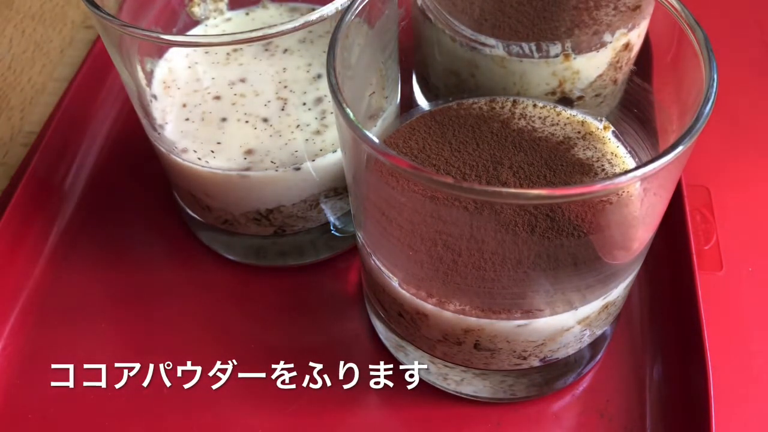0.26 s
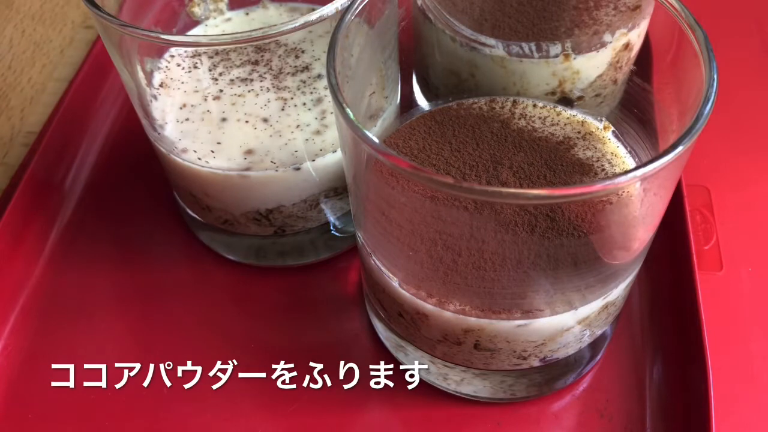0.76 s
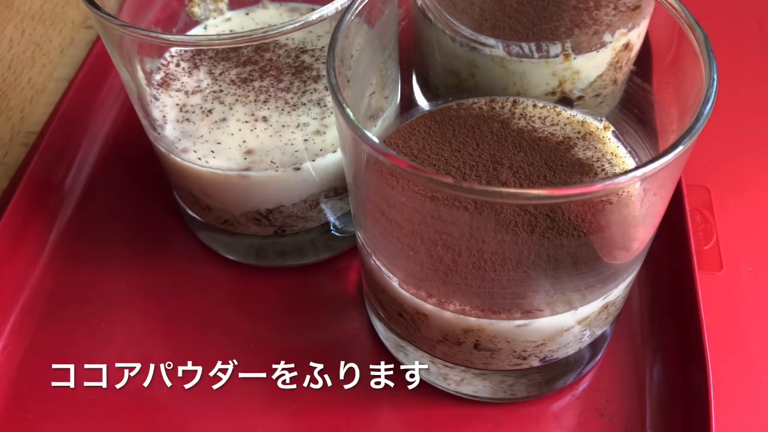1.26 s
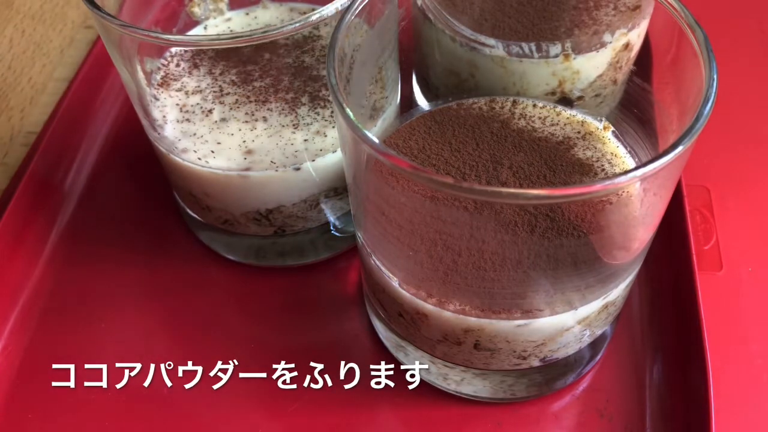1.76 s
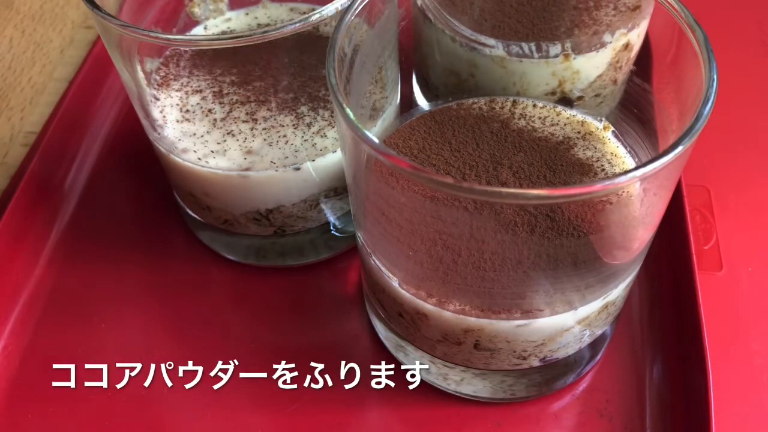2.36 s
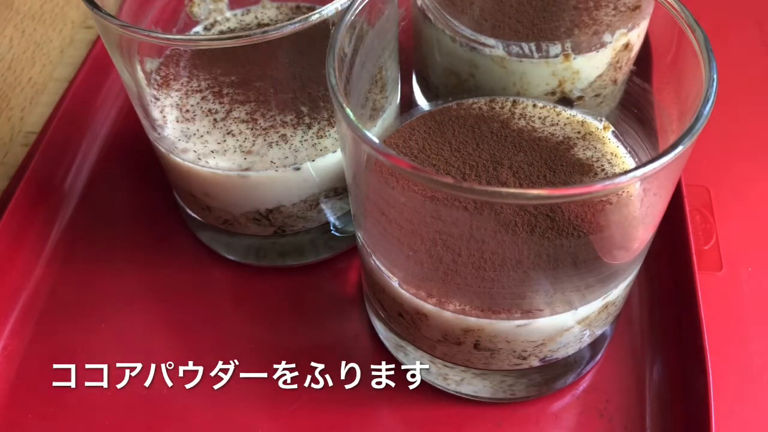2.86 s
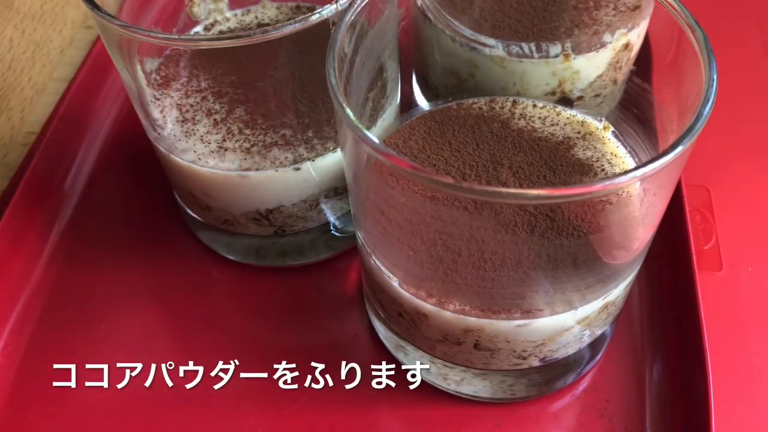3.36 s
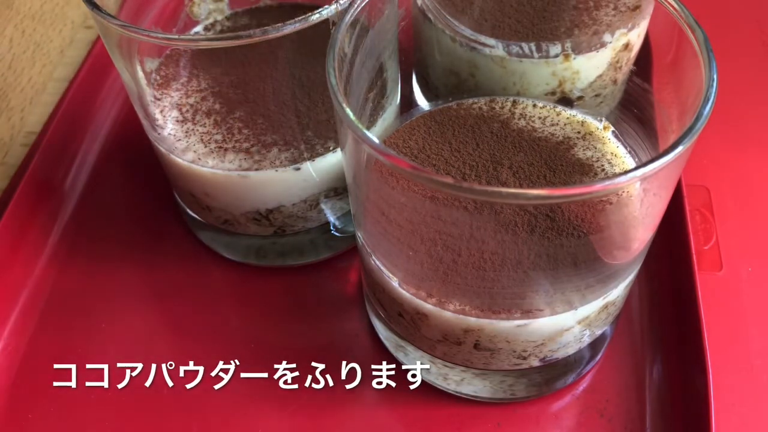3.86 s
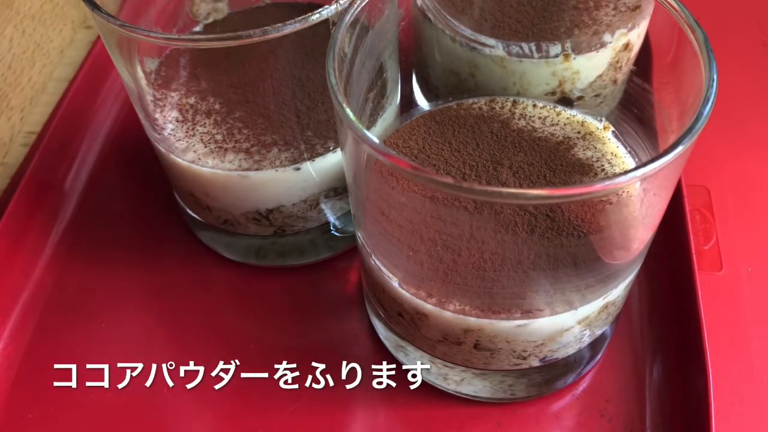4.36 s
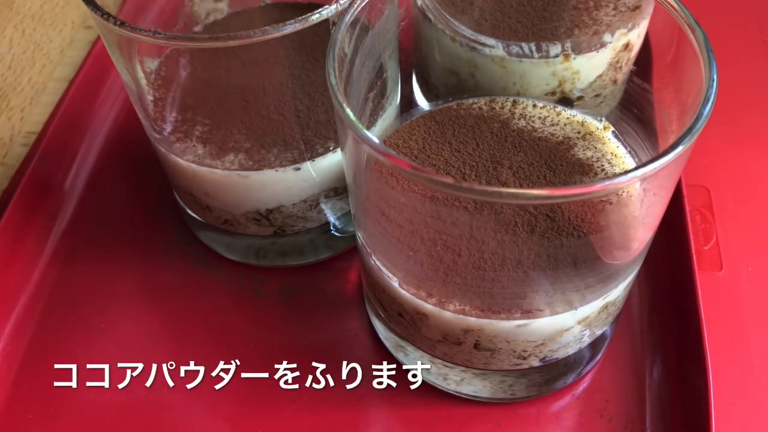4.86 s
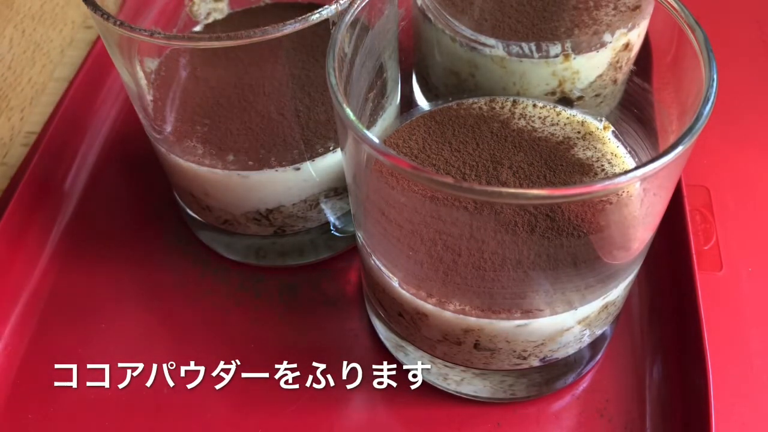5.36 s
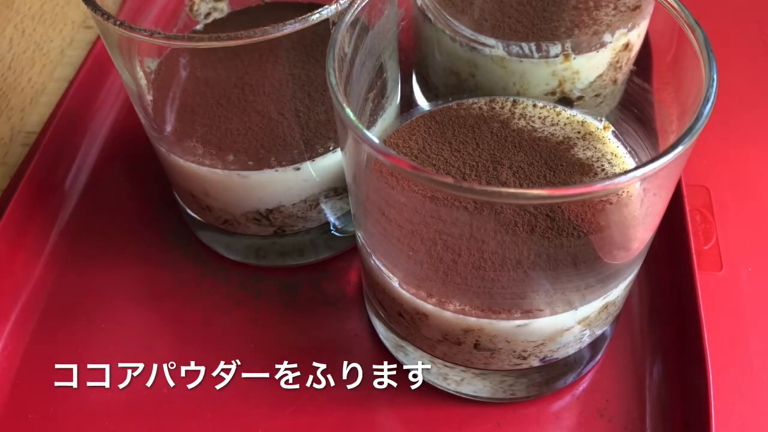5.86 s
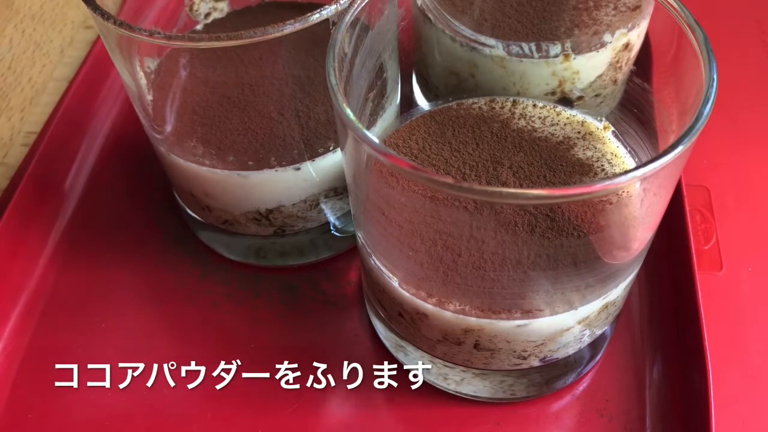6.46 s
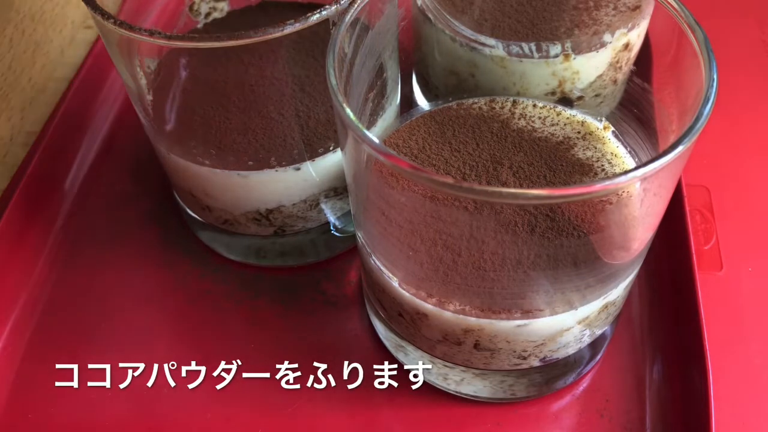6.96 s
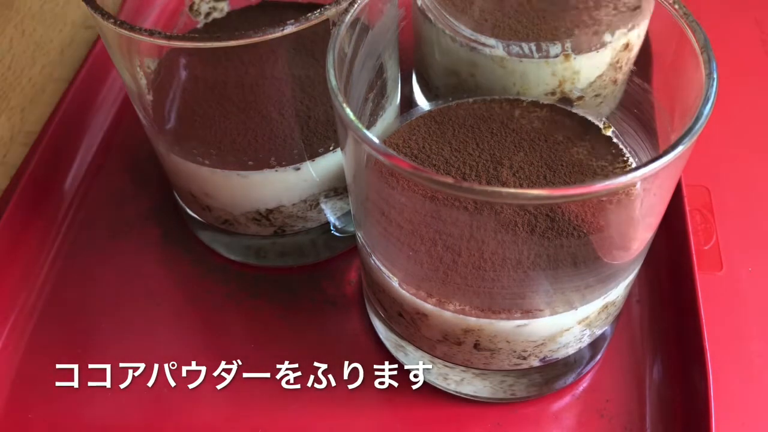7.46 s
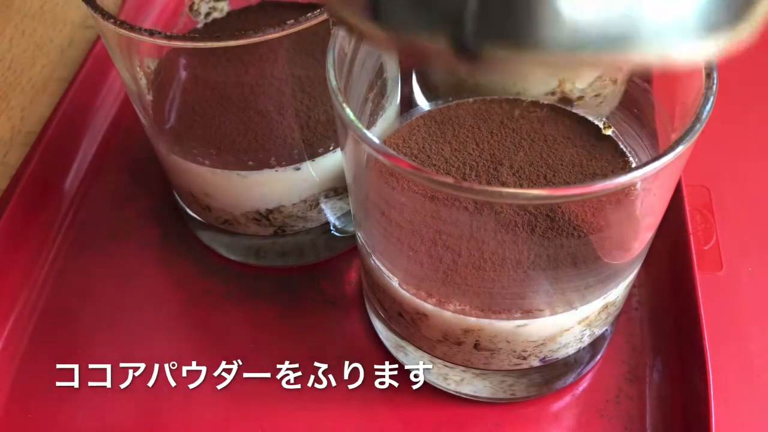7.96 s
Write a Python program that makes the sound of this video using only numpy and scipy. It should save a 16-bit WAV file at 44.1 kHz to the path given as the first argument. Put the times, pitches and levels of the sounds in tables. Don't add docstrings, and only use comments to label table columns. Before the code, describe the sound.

A small steel sieve is tapped by hand about five times a second, each crisp metallic rattle carrying a soft thud and powdery hiss.

```python
import sys
import numpy as np
from scipy import signal
from scipy.io import wavfile
from scipy.ndimage import uniform_filter1d

SR = 44100
rng = np.random.default_rng(int(sys.argv[2]) if len(sys.argv) > 2 else 0)


def log_audio(samples):
    frames = np.atleast_2d(samples).T
    limited = np.clip(frames, -1, 1)
    pcm = np.round(limited * 32767).astype(np.int16)
    wavfile.write(sys.argv[1], SR, pcm)


def makeup_ratio(level_db):
    decades = np.asarray(level_db, float) / 20
    return 10 ** decades


N = 362502

# start in seconds, rattle in dB, thud in dB, body modes in dB, # resonance of the
# struck patch of mesh in Hz.
FIRST_TAPS = [(0.0524, -39.5, -33, -47, 8020), (0.2204, -32, -31, -34.5, 9200),
              (0.3922, -23, -24.5, -33, 8900), (0.563, -26, -27, -28.5, 5700),
              (0.74, -22.5, -23, -27.5, 7200), (0.926, -18, -20.5, -27.5, 7150),
              (1.1045, -18, -23, -32.5, 6460), (1.2854, -19.5, -21.5, -28, 6440),
              (1.4643, -19, -21.5, -29, 6000), (1.642, -13, -20.5, -21, 6960),
              (1.8214, -15, -18.5, -26, 6760), (2.003, -15, -19, -28, 8200), (2.181, -14, -19, -26, 5750),
              (2.3597, -14, -20.5, -24.5, 5470), (2.546, -12, -19, -20.5, 5430),
              (2.7352, -12, -20.5, -15.5, 7600), (2.916, -10.5, -17, -15.5, 6870),
              (3.0945, -14.5, -20, -24.5, 5600), (3.2757, -19, -27, -25.5, 9050),
              (3.4652, -24, -26, -29, 4740), (3.6431, -23, -27, -27, 6600), (3.824, -25, -29, -24.5, 5600),
              (4.009, -25, -26, -25, 9300)]
# start in seconds, rattle in dB, thud in dB, body modes in dB, struck patch in Hz.
LATER_TAPS = [(4.1931, -19.5, -25, -27, 5850), (4.3687, -20.5, -22.5, -29, 5400),
              (4.5455, -19, -18.5, -21, 7400), (4.7225, -19, -22, -25, 6700),
              (4.902, -16, -22, -20.5, 6100), (5.0781, -14.5, -19.5, -19, 5130),
              (5.252, -20.5, -21, -27, 5550), (5.436, -25, -27, -29, 6300),
              (5.6225, -24.5, -25, -32.5, 5840), (5.8084, -21.5, -24.5, -28.5, 4800),
              (5.992, -19, -22, -30.5, 4220), (6.1732, -21, -24.5, -29.5, 3860),
              (6.3524, -22, -19, -31, 2580), (6.5295, -23.5, -22, -33, 3040),
              (6.738, -38.5, -37, -34, 5760), (6.9111, -25.5, -24, -22.5, 4000),
              (7.0824, -23.5, -19, -28, 3280), (7.2666, -20, -16.5, -23, 5940),
              (7.4442, -22, -18.5, -25, 8600), (7.6271, -22.5, -19, -30.5, 5600),
              (7.802, -26, -19.5, -37, 6960), (7.978, -21.5, -15.5, -24.5, 5360),
              (8.1471, -23.5, -20, -27, 4600)]
TAPS = np.array(FIRST_TAPS + LATER_TAPS)
TAP_S, RATTLE_DB, THUD_DB, BODY_DB, PATCH_HZ = TAPS.T
# start in seconds, peak in dB.
LIGHT_TOUCHES = [(0.045, -16), (0.2167, -20), (0.284, -22), (0.559, -16), (1.64, 2), (4.779, -15.5),
                 (5.487, -20), (5.913, -21), (6.294, -21), (6.4887, -20), (6.6753, -23), (6.871, -23),
                 (6.983, -16), (7.041, -14), (7.044, -34), (7.8603, -16), (6.58, -27), (7.798, -13)]
# frequency in Hz, width in Hz, level in dB.
MESH_MODES = [(3820, 94, 6.5), (4610, 420, -0.5), (5360, 206, 5), (6300, 155, 4.5), (7090, 44, 2),
              (8500, 3700, -6)]
# time in seconds, rattle length in ms.
GRIP_SLACK = [(0.05, 7.5), (0.3, 2.5), (0.75, 3.9), (2.18, 4.4), (2.36, 5.2), (2.8, 3.6), (3.3, 7.6),
              (3.85, 7.8), (4.55, 3.9), (5.0, 3.2), (5.4, 6.3), (5.8, 7.3), (6.2, 5.3), (6.55, 5.7),
              (6.91, 8.5), (7.08, 3.5), (7.4, 6.6), (7.63, 3.8)]
# time in seconds, upper over lower body modes in dB,
# flatness of the blow as knock in dB, extra treble in dB.
SIEVE_TIP = [(0.05, -0.5, -4.5, 11.5), (0.75, -1.5, 1, 7.5), (1.1, -1.5, -0.5, 3.5), (1.65, 2.5, -3.5, -1),
             (2.0, -4.5, 0, 1), (2.36, 2, 4.5, -1), (2.9, -1, 3, -2), (3.3, 3.5, 5.5, 6.5),
             (3.5, 10.5, 3, 5.5), (4.0, -0.5, -1.5, 2), (4.55, 2, 0, 1.5), (5.0, -2, 1.5, -0.5),
             (5.6, 3.5, -6, 2), (6.0, 2.5, 1.5, 1), (6.45, -1.5, 5.5, -9), (7.0, -1, -1, 7.5),
             (7.3, 2.5, 0, 0.5), (7.7, -2.5, -3.5, 4)]
# time in seconds, knuckle contact in dB, powder flow in dB.
HAND_GRIP = [(0.05, -16, -2.5), (0.3, -4, -3), (0.75, -3, 0.5), (1.1, -10, -2), (1.65, 4.5, -0.5),
             (2.2, -14, 0), (2.75, -22, 1), (3.3, 4, -0.5), (3.9, 5, 1), (4.6, 4.5, -2), (5.05, 3, -1),
             (5.65, 0.5, 0), (6.2, -5, 0), (6.5, 10, 4), (6.9, -15, 4), (7.3, 1, 0), (7.65, -10.5, 0),
             (8.1, 2, 0)]
# frequency in Hz, level in dB, 60 dB decay time in seconds.
LOW_BODY_MODES = [(222, 0, .11), (245, -11, .33), (172, -17, .25)]
# frequency in Hz, level in dB, 60 dB decay time in seconds.
HIGH_BODY_MODES = [(300.5, -2, 0.083), (334.4, -10.5, 0.075), (380.6, -17, 0.22)]
# frequency in Hz, density in dB per Hz.
POWDER_SPECTRUM = [(300, 6.5), (1200, -2.5), (2500, -6.5), (4700, -6), (6000, -7), (9000, -11),
                   (15500, -11)]
# frequency in Hz, 60 dB decay time in seconds.
POWDER_DECAY = [(500, 0.25), (3000, 0.45), (6000, 0.38), (12000, 0.44)]
# start in seconds, high pair in dB, low pair in dB.
RIM_BLOWS = [(0.3923, -62, -71), (0.926, -48, -76), (1.2854, -71, -69), (1.4643, -55, -72),
             (1.6416, -47, -65), (1.8217, -38, -69), (2.0037, -41, -72), (2.181, -44, -73),
             (2.3594, -40.5, -81), (2.546, -48, -69), (2.7349, -35.5, -59), (2.916, -42, -63),
             (3.0937, -41, -68), (3.2756, -51, -59.5), (3.6433, -64, -74), (4.009, -52, -74),
             (4.1932, -57, -71), (4.5454, -63, -73), (4.902, -56, -69), (5.0789, -43, -70),
             (5.6227, -52, -88), (5.8087, -51, -70), (5.992, -58, -80), (6.1733, -44, -66),
             (6.5296, -58, -76), (7.0828, -74, -74), (7.2661, -60, -71), (7.4446, -64, -70),
             (7.978, -60, -68), (8.1471, -77, -66.5)]
# frequency in Hz, level in dB, 60 dB decay time in seconds.
HIGH_RIM_PAIR = [(3643, 0, .22), (3664, -6, .18)]
# frequency in Hz, level in dB, 60 dB decay time in seconds.
LOW_RIM_PAIR = [(1944, 0, .45), (1958, -5, .45)]
# time in seconds, pitch in Hz, level in dB.
FAR_WHISTLES = [
    [(2.99, 2380, -62), (3.04, 2520, -55), (3.075, 2640, -51), (3.095, 2950, -57)],
    [(3.3, 1990, -59), (3.42, 2080, -57), (3.52, 2140, -49), (3.7, 2180, -59), (3.76, 2085, -55),
     (3.85, 2030, -65), (3.97, 2020, -62)],
]
# frequency in Hz, density in dB per Hz.
ROOM_SPECTRUM = [(18, -23), (30, -35), (86, -5), (141, 4), (231, 6.5), (535, -9.5), (643, -7.5),
                 (1240, -8.5), (1530, -15.5), (1930, -13.5), (2200, -20), (5510, -20.5), (15700, -27)]

SCATTER_DB = 1.3


def evened(x):
    return x / np.sqrt(np.mean(x ** 2) + 1e-20)


def read(points, hz):
    f, value = np.transpose(points)
    return np.interp(np.log(hz + 1), np.log(f + 1), value)


def add(mix, s, sound):
    part = mix[round(s * SR):][:len(sound)]
    part += sound[:len(part)]


def band(x, lo_hz, hi_hz):
    return signal.sosfilt(signal.butter(2, [lo_hz, hi_hz], "band", fs=SR, output="sos"), x)


def resonate(x, hz, width_hz):
    turn = np.exp(2j * np.pi * np.cumsum(hz * np.ones(len(x))) / SR)
    r = np.exp(-np.pi * width_hz / SR)
    return 2 * (turn * signal.lfilter([1 - r], [1, -r], x / turn + 1e-18)).real


def ring(modes, t, rise_s, turns):
    total = 0
    for (hz, db, t60), turn in zip(modes, turns):
        total = total + makeup_ratio(db - 60 * t / t60) * np.sin(2 * np.pi * (hz * t + turn))
    return (1 - np.exp(-t / rise_s)) ** 2 * total


def drift(bins, frames, bins_wide, frames_wide):
    grain = rng.standard_normal((bins, frames))
    return evened(uniform_filter1d(uniform_filter1d(grain, bins_wide, axis=0), frames_wide, axis=1))


def noise_field(db, size):
    real, imaginary = rng.standard_normal((2,) + db.shape)
    inside = np.fft.rfftfreq(size, 1 / SR)[:, None] < 15800
    spectra = (real + 1j * imaginary) * makeup_ratio(db) * inside
    return signal.istft(spectra, nperseg=size, noverlap=size * 3 // 4)[1][:N]


def at_taps(curve):
    s, *columns = np.transpose(curve)
    return [np.interp(TAP_S, s, column) for column in columns]


def landing():
    force_db = RATTLE_DB + 20
    octaves = np.log2(PATCH_HZ / 6000)
    return force_db, octaves, 9.5 - 6 * octaves + 0.53 * force_db


def chatter_burst(t, length_ms, clash_ms, grit, size, lump):
    after = np.maximum(t - .85 * length_ms / 1000, 0)
    shape = (1 - np.exp(-t / .0002)) * (makeup_ratio(-60 * after / .015) + makeup_ratio(-24 - 60 * after / .045))
    shape *= 1 + 1.1 * np.exp(-((1000 * t - clash_ms) / .55) ** 2)
    chatter = grit * makeup_ratio(2 * size + 2 * evened(uniform_filter1d(lump, 25))) * shape
    return chatter / np.sqrt(np.mean(chatter[:530] ** 2))


def rattle():
    t = np.arange(2200) / SR
    knock, mesh, treble, patch = np.zeros((4, N))
    _, octaves, sing_db = landing()
    treble_luck, knock_luck, clash_luck = rng.standard_normal((3, len(TAPS)))
    slack_ms = at_taps(GRIP_SLACK)[0]
    _, flat_db, bright_db = at_taps(SIEVE_TIP)
    treble_db = -3.5 + octaves + bright_db + SCATTER_DB * treble_luck
    knock_db = -5.5 + THUD_DB - RATTLE_DB + flat_db + SCATTER_DB * knock_luck
    clash_ms = slack_ms * np.clip(.5 + .18 * clash_luck, .1, .9)
    blows = list(zip(TAP_S, RATTLE_DB, treble_db, knock_db, PATCH_HZ, sing_db, slack_ms, clash_ms))
    blows += [(s, db - 31.0, -6.0, -12.0, 3300, 5.0, 1.3, .3) for s, db in LIGHT_TOUCHES]
    for s, db, bright, dull, hz, peak_db, ms, clash in blows:
        chatter = makeup_ratio(db) * chatter_burst(t, ms, clash, *rng.standard_normal((3, len(t))))
        add(mesh, s, chatter * makeup_ratio(-.4 * peak_db))
        add(patch, s, makeup_ratio(peak_db - 5.5) * resonate(chatter, hz, 860.0))
        add(treble, s, chatter * makeup_ratio(bright))
        add(knock, s, chatter * makeup_ratio(dull))
    ringing = sum(makeup_ratio(db) * resonate(mesh, hz, width) for hz, width, db in MESH_MODES)
    out = makeup_ratio(0.5) * ringing + makeup_ratio(4.0) * band(mesh, 2140, 8400)
    out += band(patch, 1400, 13000)
    out += makeup_ratio(-1.5) * band(treble, 5830, 16040)
    return out + makeup_ratio(8.5) * band(knock, 566, 3170)


def table_push(t):
    crest_s = .0206
    swell = (1 - np.exp(-t / .0065)) ** 2 * np.exp(-(t / .032) ** 4)
    push = swell * np.cos(2 * np.pi * (1.1 * np.log((t + 1e-4) / crest_s) + 42 * (t - crest_s)))
    push += makeup_ratio(-22 - 60 * t / .3) * np.sin(2 * np.pi * 91.5 * t) * (1 - np.exp(-t / .02))
    heave_hz, heave_db, heave_s = 54, -7, 0.027
    sag = np.sin(np.pi * np.minimum(t / heave_s, 1)) ** 2
    return push + makeup_ratio(heave_db) * np.sin(2 * np.pi * heave_hz * t) * sag


def thuds():
    t, out = np.arange(9000) / SR, np.zeros(N)
    push = table_push(t)
    chance = .07 * rng.standard_normal((len(TAPS), 3, 3))
    lean = at_taps(SIEVE_TIP)[0] + SCATTER_DB * rng.standard_normal(len(TAPS))
    knuckles_db = at_taps(HAND_GRIP)[0]
    rows = zip(TAP_S - 0.0007, THUD_DB, BODY_DB, knuckles_db, lean, chance)
    for s, thud_db, body_db, knuckle_db, lean_db, c in rows:
        pressed = t * (1 + .016 * np.tanh(14 * c[2, 2]))
        low = ring(LOW_BODY_MODES, pressed, 0.0029, c[0] + [.55, .27, .6])
        high = ring(HIGH_BODY_MODES, pressed, 0.00025, c[1] + [.2, .3, .6])
        knuckle = ring([(449, 0.0089, 0.021)], t, 0.00073, c[2] + 1.04)
        add(out, s, makeup_ratio(thud_db + 1.0) * push)
        add(out, s + 0.0039, makeup_ratio(body_db - lean_db + 3.5) * low)
        add(out, s + 0.003394, makeup_ratio(body_db + lean_db + 5.0) * high)
        add(out, s + 0.0029, makeup_ratio(thud_db + knuckle_db + 2.0) * knuckle)
    murk = band(rng.standard_normal(len(t)), 60, 450) * makeup_ratio(-60 * t / .35) * (t > .03)
    wall = np.roll(out, round(.044 * SR))
    return out + makeup_ratio(-21) * wall + makeup_ratio(-34) * signal.oaconvolve(out, murk / np.linalg.norm(murk))[:N]


def powder():
    hz, t = np.fft.rfftfreq(256, 1 / SR)[:, None], np.arange(N // 64 + 5) * 64 / SR
    power = np.full((len(hz), len(t)), 1e-12)
    force_db, octaves, sing_db = landing()
    hisses_db = -37.5 + 0.6 * force_db + at_taps(HAND_GRIP)[1]
    trebles_db = -2.7 + octaves
    blooms_hz = rng.uniform(3300, 6250, len(TAPS))
    buzzes_db = 0.1 * np.maximum(force_db, 0)
    shares = rng.random((len(TAPS), len(MESH_MODES)))
    rows = zip(TAP_S, PATCH_HZ, sing_db, hisses_db, trebles_db, blooms_hz, buzzes_db, shares)
    for s, patch_hz, peak_db, hiss_db, treble_db, bloom_hz, buzz_db, c in rows:
        near = (t > s + .003) & (t < s + .6)
        since = t[near] - s - .003
        bloom_db = 2.2 * np.exp(-(np.log((hz + 1) / bloom_hz) / 0.037) ** 2)
        bloom_db += 0.3 * peak_db * np.exp(-(np.log((hz + 1) / patch_hz) / 0.27) ** 2)
        for (mode_hz, width_hz, _), share in zip(MESH_MODES, c):
            bloom_db += 4.9 * share * np.exp(-((hz - mode_hz) / width_hz) ** 2)
        bloom_db += buzz_db * np.exp(-(np.log2((hz + 1) / 5300) / 0.6) ** 2)
        tilt_db = treble_db * np.clip(np.log2((hz + 1) / 5500), 0, 1)
        fading_db = hiss_db + bloom_db + tilt_db - 60 * since / read(POWDER_DECAY, hz)
        power[:, near] += makeup_ratio(fading_db) ** 2 * np.minimum(since / 0.0064, 1)
    flicker_db = 1.25 * drift(129, len(t), 30, 4)
    flicker_db += 1.5 * drift(129, len(t), 3, 45)
    colour_db = read(POWDER_SPECTRUM, hz)
    unit = np.std(noise_field(colour_db + 0 * t[:200], size=256))
    return noise_field(colour_db + flicker_db + 10 * np.log10(power), size=256) / unit


def rim():
    t, out = np.arange(12000) / SR, np.zeros(N)
    for (s, high_db, low_db), c in zip(RIM_BLOWS, rng.random((len(RIM_BLOWS), 2, 2))):
        high = ring(HIGH_RIM_PAIR, t, 0.00031, c[0])
        low = ring(LOW_RIM_PAIR, t, 0.0012, c[1])
        add(out, s, makeup_ratio(high_db + 8.0) * high + makeup_ratio(low_db + 22.5) * low)
    waver = evened(uniform_filter1d(uniform_filter1d(rng.standard_normal(N), 500), 500))
    return out * makeup_ratio(2.6 * waver)


def whistles():
    out = np.zeros(N)
    for rows in FAR_WHISTLES:
        s, hz, db = np.transpose(rows)
        t = np.arange(s[0], s[-1], 1 / SR)
        tone = evened(resonate(rng.standard_normal(len(t)), np.interp(t, s, hz), 20.))
        add(out, s[0], tone * makeup_ratio(np.interp(t, s, db)) * signal.windows.tukey(len(t), .2))
    return out


def kitchen():
    hz, frames = np.fft.rfftfreq(1024, 1 / SR)[:, None], N // 256 + 5
    hum_hz, hum_width_hz, hum_db, room_db = 50, 5.9, -57, -48
    hum = resonate(rng.standard_normal(N), hum_hz, hum_width_hz)
    hum = evened(resonate(hum, hum_hz, hum_width_hz))
    spectrum_db = read(ROOM_SPECTRUM, hz) + 1.2 * drift(513, frames, 10, 12)
    return makeup_ratio(hum_db) * hum + makeup_ratio(room_db) * evened(noise_field(spectrum_db, size=1024))


def scene():
    return (rattle() + thuds() + powder() + rim() + whistles() + kitchen())[None]


def low_pass(x):
    return signal.sosfilt(signal.butter(12, 16830, fs=SR, output="sos"), x)


def record(dry):
    x = signal.sosfilt(signal.butter(4, 40, "high", fs=SR, output="sos"), dry)
    lowpass = signal.firwin(127, 16150, window=("kaiser", 7), fs=SR)
    x = signal.oaconvolve(np.clip(x, -1, 1), lowpass[None], "same")
    return low_pass(np.clip(x, -1, 1))


dry = scene()
out = record(dry)
log_audio(out)
```